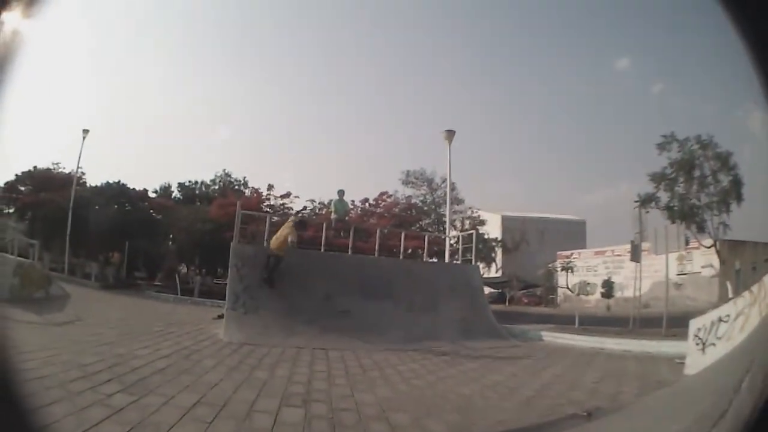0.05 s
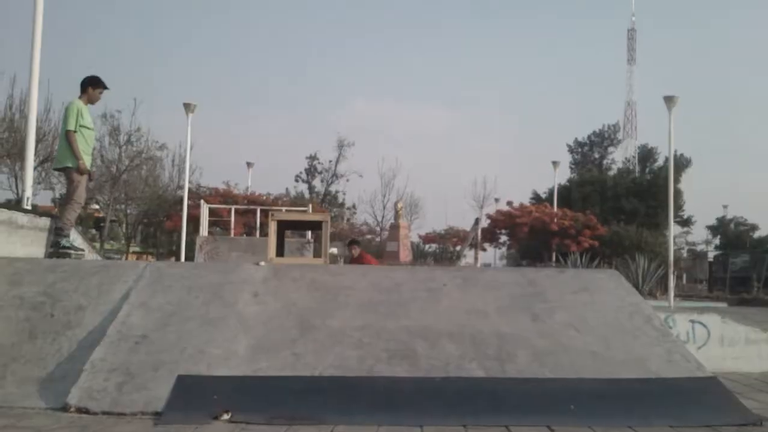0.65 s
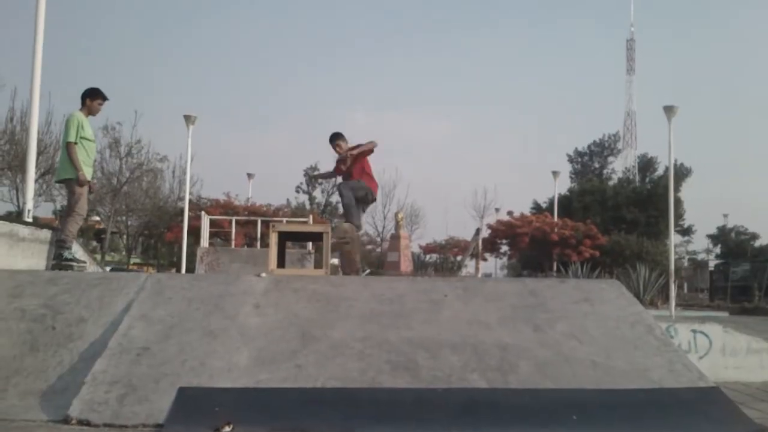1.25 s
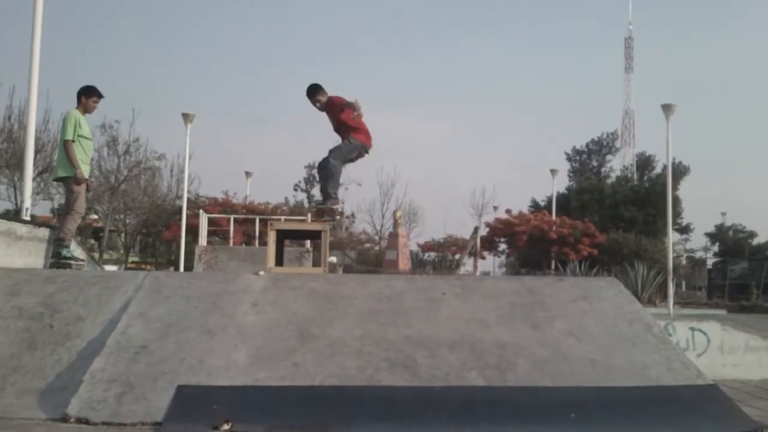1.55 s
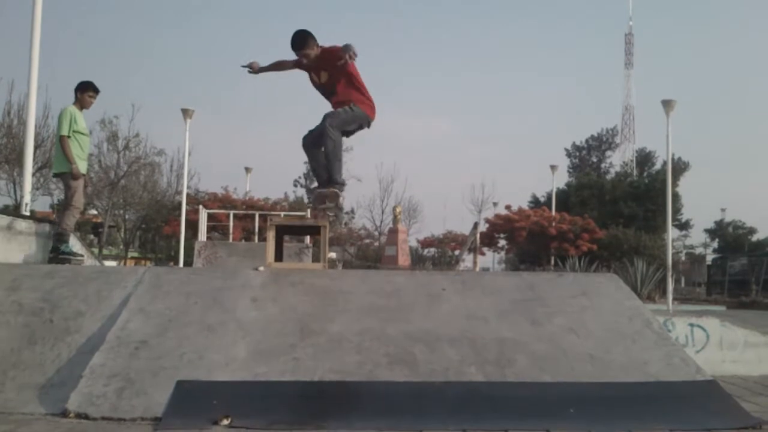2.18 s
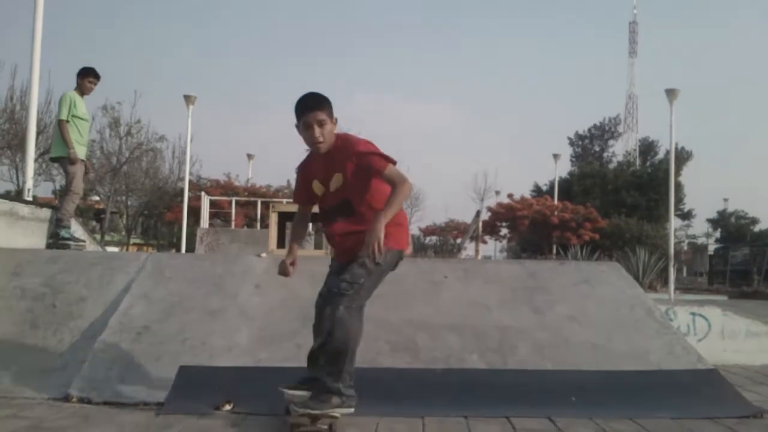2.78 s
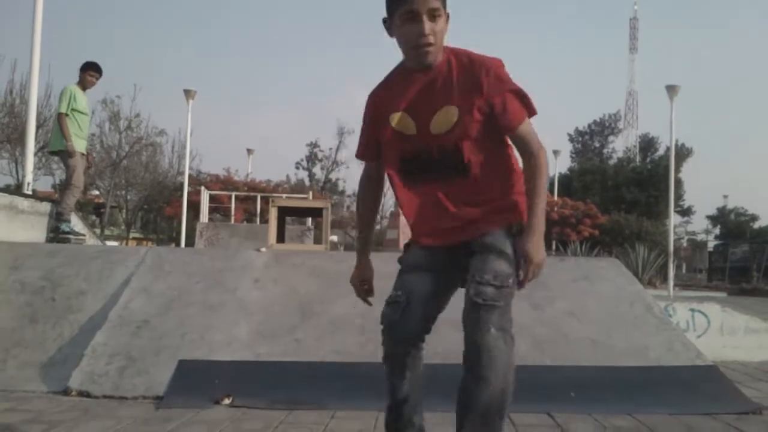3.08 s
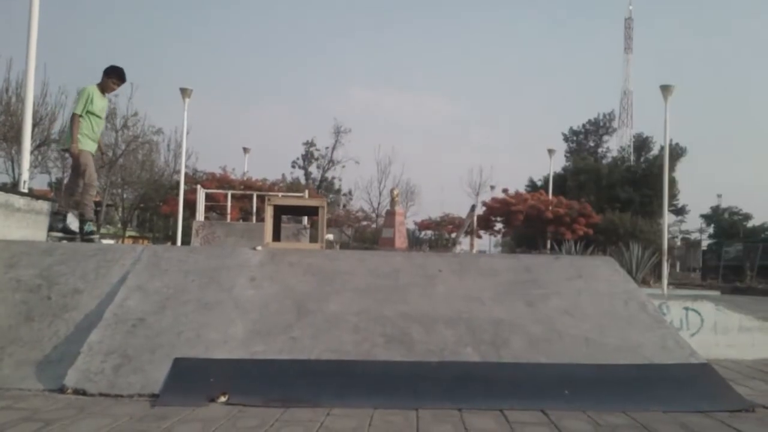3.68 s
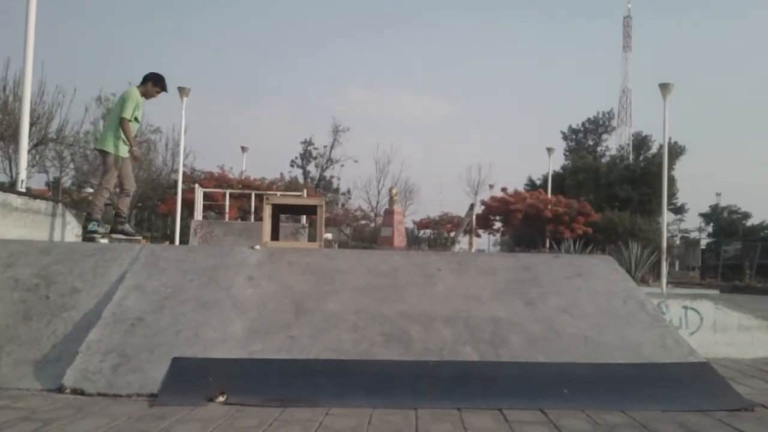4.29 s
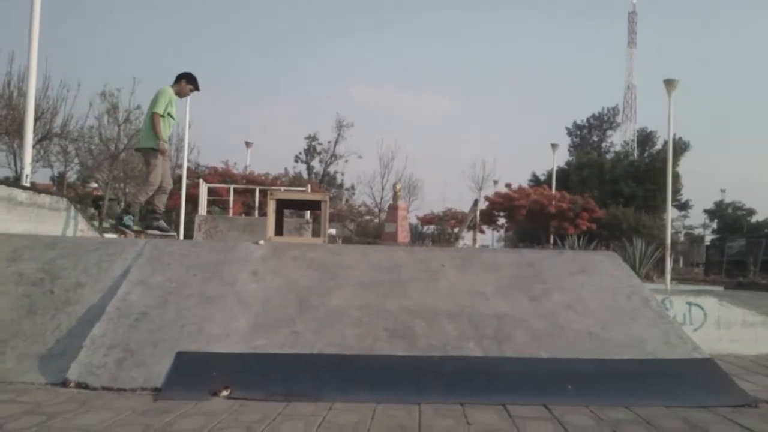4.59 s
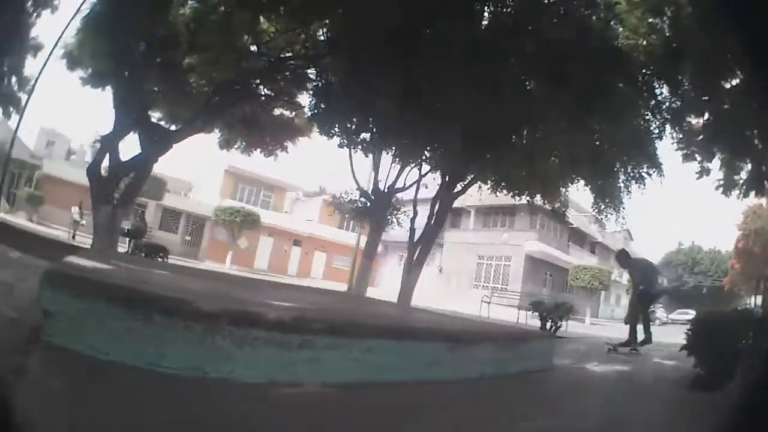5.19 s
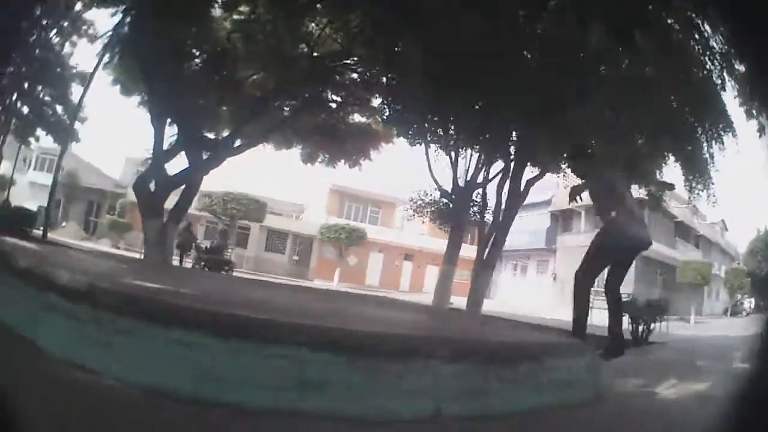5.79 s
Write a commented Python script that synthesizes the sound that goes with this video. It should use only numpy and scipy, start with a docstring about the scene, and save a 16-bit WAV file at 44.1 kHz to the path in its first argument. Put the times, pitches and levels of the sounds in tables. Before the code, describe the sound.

Skateboard wheels rumble on concrete with sharp clacks, a short grind, a loud rattling pass and two quick skids, over light wind.

```python
"""Skateboarding on concrete in three places, over wind and town wash, on a small microphone that overloads.
First a board rumbles away up a ramp under faint whistles. At 0.39 s, in the second place, a skater runs up,
pops onto a box, grinds it on the trucks, drops down a bank and clatters past over paving joints; wheels stick
and slip in two skids, and another board rolls in with a rising whirr. At 4.86 s, in the third place, a board
roars over rough concrete and is popped at a ledge, tail and wheels ringing the deck."""
import sys
import numpy as np
from scipy import signal
from scipy.fft import rfft, irfft
from scipy.io import wavfile
from scipy.ndimage import uniform_filter1d

SR = 44100
rng = np.random.default_rng(int(sys.argv[2]) if len(sys.argv) > 2 else 0)


def wrap_up_sound(samples):
    """Save the sound to the file named by the first command line argument, as 16-bit audio."""
    columns = np.atleast_2d(samples).T
    # keep every value between -1 and 1, then stretch to whole-number steps
    tamed = np.clip(columns, -1, 1)
    steps = np.round(tamed * 32767).astype(np.int16)
    wavfile.write(sys.argv[1], SR, steps)


N = 257984
TIME = np.arange(N) / SR
SECOND_PLACE_S, THIRD_PLACE_S = 0.39, 4.864
BANK_S, PAVING_S, CLOSEST_S, GONE_S = 2.52, 2.78, 3.68, 4.19   # cues of the pass-by
LOW_EDGE_HZ, HIGH_EDGE_HZ = 400, 1500   # crossovers between rumble, roar and grit


def from_db(db):
    return 10 ** (np.asarray(db) / 20)


def rms_one(x):
    return x / np.sqrt(np.mean(x ** 2) + 1e-20)


def gate(start, end):
    """Open between two times, with 6 ms fades."""
    return np.clip(np.minimum(TIME - start, end - TIME) / .006 + 1, 0, 1)


def arch(full_s, leave_s, rise_db_per_s, fall_db_per_s):
    """Attack, hold and release, in dB relative to the hold."""
    return -rise_db_per_s * np.maximum(full_s - TIME, 0) - fall_db_per_s * np.maximum(TIME - leave_s, 0)


def add(out, start_s, sound):
    """Mix a one-shot in at its cue."""
    at = max(round(start_s * SR), 0)
    out[at:at + len(sound)] += sound[:N - at]


def cut(x, hz, kind, order=2):
    return signal.sosfilt(signal.butter(order, hz, kind, fs=SR, output="sos"), x)


def coloured(x, eq):
    """Apply an EQ curve that rolls off beyond its ends."""
    hz, db = np.transpose(eq)
    f = np.maximum(np.arange(N // 2 + 1) * SR / N, 1)
    skirts = 1 / (1 + (hz[0] / f) ** 8) / (1 + (f / hz[-1]) ** 8)
    return irfft(rfft(x) * from_db(np.interp(np.log(f), np.log(hz), db)) * np.sqrt(skirts), N)


def resonate(x, hz, width_hz):
    """One resonance, with its upper skirt damped."""
    r = np.exp(-np.pi * width_hz / SR)
    rung = signal.lfilter([1 - r, 0, r - 1], [1, -2 * r * np.cos(2 * np.pi * hz / SR), r * r], x + 1e-18)
    return cut(rung, min(2 * hz, SR / 3), "low")


def body(force, modes):
    """A sustained force through parallel resonances of alternating polarity; rms 1."""
    return rms_one(sum((-1) ** k * from_db(db) * rms_one(resonate(force, hz, width))
                       for k, (hz, width, db) in enumerate(modes)))


def drift(rate_hz):
    """Random modulation with spread 1."""
    knots = rng.standard_normal(2048)
    return np.interp(TIME * rate_hz % 2047, np.arange(2048), knots) * np.sqrt(1.5)


def grains(per_s, spread_db):
    """Tiny collisions of uneven size at random moments; rms 1."""
    sizes = from_db(spread_db * np.minimum(rng.exponential(1, N), 4)) * rng.choice([-1, 1], N)
    return rms_one(sizes * (rng.random(N) < per_s / SR))


def gliding(hz, width_hz, spread_db):
    """The grain of the ground excites one resonance whose pitch moves; rms 1."""
    carrier = np.exp(2j * np.pi * np.cumsum(hz) / SR)
    return rms_one((carrier * cut(grains(3000, spread_db) / carrier, width_hz / 2, "low")).real)


def blow(modes, rattle_s, crack, scatter=0.016, clump_db=2.0):
    """A sharp contact and an uneven dying rattle ring each mode; one row of samples per mode."""
    t = np.arange(SR // 4) / SR
    clumps = np.interp(t, np.arange(100) / 400, rng.standard_normal(100))
    envelope = np.exp(-t / rattle_s) * from_db(clump_db * clumps)
    rings = []
    for k, (hz, width, db) in enumerate(modes):
        force = rng.standard_normal(len(t)) * envelope
        force[0] += crack * (-1) ** k
        # load and point of contact vary from blow to blow and detune the modes, the high ones most
        detune = np.exp(scatter * np.sqrt(hz / 1000) * rng.standard_normal())
        ring = resonate(force, hz * detune, width)
        loudest_rms = np.sqrt(uniform_filter1d(ring ** 2, SR // 200).max())
        rings.append(from_db(db) * ring / loudest_rms)
    return np.array(rings)


# EQ of the wind buffeting: frequency_hz, gain_db
WIND_EQ = [(8.8, -35.5), (15, -23.5), (36, -1), (49, 2), (59, -3.5), (75, -3), (140, -8.5), (158, -14),
           (200, -10.5), (260, -41.5), (440, -120)]
# EQ of the distant town: frequency_hz, gain_db
TOWN_EQ = [(65, -23.5), (110, -7), (217, -10.5), (270, -3.5), (386, -14.5), (723, -13), (1680, -24.5),
           (3150, -38.5), (5390, -51), (8000, -96), (10400, -112), (17600, -120)]
# Fader moves of the ambience bed: time_s, wind_db (before trim), town_db
AIR_FADERS = [(0.0, -33.5, -36.5), (0.38, -32.5, -46), (0.4, -32, -40.5), (1.4, -32, -37), (2.4, -33, -37),
              (4.2, -36.5, -41), (4.85, -34, -42), (4.9, -39.5, -34.5), (5.85, -42, -43)]


def open_air(wind_trim_db=2.5, gust_db=1.0):
    """Wind buffets the microphone over the wash of the town."""
    time_s, wind_db, town_db = np.transpose(AIR_FADERS)
    wind = rms_one(coloured(rng.standard_normal(N), WIND_EQ))
    wind *= from_db(np.interp(TIME, time_s, wind_db) + wind_trim_db + gust_db * drift(13))
    town = rms_one(coloured(rng.standard_normal(N), TOWN_EQ))
    return wind + town * from_db(np.interp(TIME, time_s, town_db))


def park_echo(x, echo_db=-17, t60_s=0.2, dull_hz=4500):
    """Ramps and walls add a short, dull tail to the direct sound."""
    t = np.arange(SR // 2) / SR
    tail = cut(rng.standard_normal(len(t)) * from_db(-60 * t / t60_s) * (t > .008), dull_hz, "low")
    return x + from_db(echo_db) * signal.fftconvolve(x, tail / np.linalg.norm(tail))[:N]


# Thin, high swells: full_s, release_s, pitch_hz, level_db
WHISTLES = [(0.082, 0.1, 4115, -56), (0.125, 0.15, 4120, -64.5), (0.165, 0.237, 4140, -54.5),
            (0.262, 0.363, 4130, -55), (0.105, 0.14, 4500, -67), (0.277, 0.374, 4540, -57)]


def whistles(waver_hz=7, flutter_db=3.0, fade_db_per_s=800):
    """Faint whistles swell, waver and fade in the first place."""
    out = 0
    for full_s, release_s, pitch_hz, level_db in WHISTLES:
        phase = 2 * np.pi * np.cumsum(pitch_hz + waver_hz * drift(71)) / SR
        swell_db = arch(full_s, release_s, fade_db_per_s, fade_db_per_s) + flutter_db * drift(29.6)
        out = out + np.sqrt(2) * np.sin(phase) * from_db(level_db + swell_db)
    return out * gate(0, SECOND_PLACE_S)


def rolling(band_db, eq, bumps_per_s, lumpy_db):
    """Wheels run over the grains of the concrete; unevenness makes the load on them flutter."""
    # single bumps stand out of a wash of countless finer ones
    ground = coloured(grains(bumps_per_s, spread_db=2.0) + 0.78 * rng.standard_normal(N), eq)
    rumble = cut(ground, LOW_EDGE_HZ, "low", order=4)
    roar = cut(ground, [LOW_EDGE_HZ, HIGH_EDGE_HZ], "band", order=4)
    grit = cut(ground, HIGH_EDGE_HZ, "high", order=4)
    mix = sum(from_db(db) * rms_one(band) for db, band in zip(band_db, (rumble, roar, grit)))
    return mix * from_db(lumpy_db * drift(110))


# EQ of wheels on the ramp: frequency_hz, gain_db
RAMP_EQ = [(59, -32), (100, 3), (295, -11.5), (467, -8.5), (765, -14), (971, -15), (1190, -23.5),
           (4210, -51), (5060, -53), (5340, -88), (8000, -68), (10400, -108), (17600, -120)]
# Their base mix: rumble_db, roar_db, grit_db
RAMP_MIX = (-35, -32, -47)


def ramp_roll(fade_shares=(0.23, 1, 1)):
    """A board rolls away up a ramp, its rumble lasting longest."""
    away_db = arch(0, 0.047, 0, fall_db_per_s=130)
    band_db = [db + share * away_db for db, share in zip(RAMP_MIX, fade_shares)]
    return rolling(band_db, RAMP_EQ, bumps_per_s=2200, lumpy_db=2.5) * gate(0, SECOND_PLACE_S)


# EQ of wheels on the run-up: frequency_hz, gain_db
RUN_UP_EQ = [(59, -37), (100, -3.5), (247, 2.5), (410, -15.5), (587, -11), (1200, -23.5), (1450, -20.5),
             (2700, -23), (4080, -18), (7320, -77), (9000, -77), (11700, -111), (19800, -120)]
# Their base mix: rumble_db, roar_db, grit_db
RUN_UP_MIX = (-38, -38.5, -62.5)


def run_up(slows_s=0.93):
    """A board runs up behind the bank and fades as it slows, until the first pop."""
    roll = rolling(RUN_UP_MIX, RUN_UP_EQ, bumps_per_s=970, lumpy_db=3.0)
    return roll * from_db(arch(0, slows_s, 0, fall_db_per_s=28)) * gate(SECOND_PLACE_S, SLAMS[0][0])


# EQ of the other board's wheels: frequency_hz, gain_db
OTHER_BOARD_EQ = [(59, -23), (100, 7.5), (124, -3), (164, 4), (240, 2.5), (388, -9), (473, 2), (599, -20),
                  (743, 7.5), (1510, -13), (2370, -11), (2950, -34), (3450, -33), (5640, -26), (11000, -58),
                  (14300, -100), (22000, -120)]
# Their base mix: rumble_db, roar_db, grit_db
OTHER_BOARD_MIX = (-18, -27, -38.5)


def other_board(start_s=4.47, full_s=4.926, swell_shares=(.9, .75, .45), whirr_db=-36.5, rasp_db=-14.5):
    """Another board rolls in after the skids, swelling and rasping higher as it gathers speed."""
    swell_db = arch(full_s, THIRD_PLACE_S, rise_db_per_s=56, fall_db_per_s=0)
    band_db = [db + share * swell_db for db, share in zip(OTHER_BOARD_MIX, swell_shares)]
    roll = rolling(band_db, OTHER_BOARD_EQ, bumps_per_s=1200, lumpy_db=3.0)
    whirr_hz = 1800 + 2760 * np.clip(TIME - start_s, 0, 1)
    whirr = gliding(whirr_hz, width_hz=480, spread_db=5.5)
    rasp = from_db(rasp_db) * gliding(1.7 * whirr_hz, width_hz=1100, spread_db=2.0)
    whirr_gain = from_db(whirr_db + 0.5 * swell_db + 2.0 * drift(130))
    return (roll + (whirr + rasp) * whirr_gain) * gate(start_s, THIRD_PLACE_S)


# EQ of wheels on rough concrete: frequency_hz, gain_db
ROUGH_EQ = [(59, -66), (100, -25), (146, -1), (304, -5), (460, 1), (621, -5.5), (779, -1), (958, -10),
            (1160, -7), (1780, -14), (2910, -29.5), (5310, -30.5), (6660, -42.5), (8040, -90.5),
            (9000, -93), (11700, -116), (19800, -120)]
# Their base mix: rumble_db, roar_db, grit_db
ROUGH_MIX = (-27, -23, -44.5)


def rough_roll(patch_s=5.05, patch_fade_s=0.064, patch_db=13, lift_s=(5.517, 5.537), lift_db=-7):
    """A board roars over rough concrete, crosses a gritty patch, and ducks briefly as its wheels lift."""
    rumble_db, roar_db, grit_db = ROUGH_MIX
    grit_db = grit_db + patch_db * np.exp(-np.abs(TIME - patch_s) / patch_fade_s)
    roll = rolling((rumble_db, roar_db, grit_db), ROUGH_EQ, bumps_per_s=8300, lumpy_db=1.64)
    fader_db = lift_db * gate(*lift_s) + arch(0, SLAMS[-1][0], 0, fall_db_per_s=0.5)
    return roll * from_db(fader_db) * gate(THIRD_PLACE_S, TIME[-1])


def pass_path(speed_m_per_s=6.1, miss_m=0.77, bank_db=-10, jolt_db=6, settle_s=0.073, behind_s=3.94):
    """The pass-by: bearing (-1 approaching, 1 leaving), distance gain and ground gain, both in dB."""
    along_m = speed_m_per_s * (TIME - CLOSEST_S)
    distance_m = np.hypot(along_m, miss_m)
    # a quiet, smooth bank, a jolt at its foot, then the shadow behind the microphone
    surface_db = np.where(TIME < PAVING_S, bank_db, jolt_db * np.exp(-np.abs(TIME - PAVING_S) / settle_s))
    shadow_db = arch(0, behind_s, 0, fall_db_per_s=30)
    return along_m / distance_m, 20 * np.log10(miss_m / distance_m), surface_db + shadow_db


def shaking(kick_db, settle_s):
    """How hard the board still shakes: each of the WHEEL_KNOCKS kicks it, and it settles."""
    kicks = np.zeros(N)
    for (start_s, *_), db in zip(WHEEL_KNOCKS, kick_db):
        add(kicks, start_s, from_db([db]))
    return signal.lfilter([1], [1, -np.exp(-1 / (settle_s * SR))], kicks + 1e-18)


# EQ of wheels on paving: frequency_hz, gain_db
PAVING_EQ = [(59, 0), (100, 14), (424, -1), (687, -8.5), (817, -11), (1160, -17), (1430, -17.5),
             (1700, -35), (1980, -21), (2800, -38), (3270, -37), (6540, -52.5), (10000, -89), (13000, -87),
             (22000, -120)]
# Their base mix: rumble_db, roar_db, grit_db
PAVING_MIX = (-22.5, -22.5, -38.5)
# How each band follows distance (1 = inverse distance): rumble_share, roar_share, grit_share
DISTANCE_SHARES = (0.55, 0.93, 0.055)
# Swells of the wheels' hollow ring: full_s, release_s, width_hz, level_db
HOLLOW_SWELLS = [(2.924, 3.143, 85, -31), (3.603, 3.695, 110, -23.5)]


def pass_by(near_db, ground_db, hollow_hz, full_jolt_db=-17, lull_db=-6):
    """The board rolls down the bank and past, loudest just after each knock; its wheels ring hollow."""
    band_db = [db + share * near_db for db, share in zip(PAVING_MIX, DISTANCE_SHARES)]
    roll = rolling(band_db, PAVING_EQ, bumps_per_s=1100, lumpy_db=2.5)
    ring = 0
    for full_s, release_s, width_hz, level_db in HOLLOW_SWELLS:
        swell_db = arch(full_s, release_s, rise_db_per_s=140, fall_db_per_s=80)
        ring = ring + gliding(hollow_hz, width_hz, spread_db=8.0) * from_db(level_db + swell_db)
    # close by, the lulls between knocks are heard; farther off they fill in
    shake = shaking([level_db for _, level_db, *_ in WHEEL_KNOCKS], settle_s=0.024)
    calm = 1 - np.tanh(shake / from_db(full_jolt_db))
    duck_db = lull_db * calm * from_db(near_db / 2)
    return (roll * from_db(ground_db) + ring) * from_db(duck_db) * gate(BANK_S, GONE_S)


# Wheel hubs, rung by grit and bearings: pitch_hz, width_hz, gain_db
HUB_MODES = [(2120, 340, 3), (3050, 620, -5.5), (4080, 1100, 0.5), (5500, 990, -6.5), (6800, 2600, -3)]
# Scuffs of wheels and shoes: full_s, release_s, level_db
SCUFFS = [(0.805, 0.812, -46.5), (0.875, 0.877, -43.5), (0.926, 0.936, -47), (1.34, 1.344, -54),
          (1.385, 1.385, -59), (1.533, 1.547, -59), (1.587, 1.577, -59), (2.594, 2.696, -54.5),
          (2.912, 2.915, -34), (3.297, 3.338, -37.5), (3.835, 3.867, -39.5), (4.473, 4.494, -40.5)]


def scuffs(uneven_db=1.0):
    """Wheels and shoes crush grit in brief, dense scrapes."""
    grit = cut(body(grains(4000, spread_db=3.5), HUB_MODES), 6470, "low", order=6)
    envelope = sum(from_db(level_db + arch(full_s, release_s, rise_db_per_s=2500, fall_db_per_s=260))
                   for full_s, release_s, level_db in SCUFFS)
    return grit * from_db(uneven_db * drift(150)) * envelope


def bearings(pass_db, tick_db=-34, pass_share=0.81, clatter_db=-16.5):
    """Loose bearings tick all through the pass-by; each of the WHEEL_KNOCKS shakes out a gritty clatter."""
    ticks = cut(body(grains(1500, spread_db=4.5), WHEEL_MODES[2:]), 5560, "low", order=4)
    ticks *= from_db(tick_db + pass_share * pass_db) * gate(PAVING_S, GONE_S)
    clatter = cut(body(grains(3000, spread_db=2.0), HUB_MODES), 7200, "low", order=6)
    shake = shaking([level_db + click_db for _, level_db, _, _, click_db in WHEEL_KNOCKS], settle_s=0.011)
    return ticks + clatter * from_db(clatter_db) * shake


# Body of a skidding urethane wheel: pitch_hz, width_hz, gain_db
URETHANE_MODES = [(332, 210, -9), (650, 330, 0), (1070, 140, -3.5), (1420, 190, 0), (2030, 63, -10.5),
                  (2263, 190, -5.5), (3510, 370, -8.5), (4570, 960, -6.5), (5700, 1300, -12),
                  (9300, 4800, -19.5)]
# Sideways skids: start_s, end_s, slips_per_s, wander_share, grit_db, chatter_db, squeal_db, bend_hz
SKIDS = [(4.259, 4.298, 358, .055, -20, -20.5, -29.5, 25.1),
         (4.333, 4.382, 333, .035, -26.5, -19, -23, 242)]


def skids(touch_s=4.237, hiss_db=-22, travel_s=0.0036, squeal_hz=1940, bend_s=0.0084):
    """A wheel sticks and slips in a rasping buzz under hissing grit; at full grip it squeals."""
    rows = np.array(SKIDS)
    nearest = np.abs(TIME[:, None] - rows[:, :2].mean(axis=1)).argmin(axis=1)
    start_s, end_s, slips_per_s, wander_share, grit_db, chatter_db, squeal_db, bend_hz = rows[nearest].T
    slip_count = np.cumsum(slips_per_s * (1 + wander_share * drift(70) + .035 * drift(200))) / SR
    slips = np.diff(np.floor(slip_count), prepend=0) * from_db(2.2 * drift(300))
    noise = rng.standard_normal(N)
    force = slips + from_db(grit_db) * noise + from_db(hiss_db) * cut(noise, 3000, "high", order=4)
    # bending waves carry the highs faster than the lows and smear each slip; travel_s holds at 1 kHz
    f = np.arange(N // 2 + 1) * SR / N
    smeared = irfft(rfft(force) * np.exp(-4j * np.pi * travel_s * np.sqrt(1000 * f)), N)
    chatter = cut(body(smeared, URETHANE_MODES), 9500, "low", order=6) * from_db(chatter_db)
    pitch_hz = squeal_hz + bend_hz * np.exp(np.minimum(TIME - end_s, 0) / bend_s)
    phase = 2 * np.pi * np.cumsum(pitch_hz * (1 + 0.0141 * drift(400))) / SR
    grip_db = arch(end_s, end_s, rise_db_per_s=280, fall_db_per_s=1997) + 2.0 * drift(350)
    squeal = np.sqrt(2) * np.sin(phase) * from_db(squeal_db + grip_db)
    envelope = from_db(arch(start_s, end_s, rise_db_per_s=900, fall_db_per_s=1004))
    return (chatter + squeal) * envelope * gate(touch_s, THIRD_PLACE_S)


# Body of the box under the trucks: pitch_hz, width_hz, gain_db
BOX_MODES = [(690, 630, 0.5), (1274, 200, -3), (1540, 84, -1.5), (2145, 130, -6.5), (2620, 220, -4.5),
             (4270, 760, -17.5)]
# Ring of the trucks as they bite: pitch_hz, width_hz, gain_db
BITE_MODES = [(1240, 90, 0.5), (1480, 160, -2), (2540, 200, -4)]


def grind(start_s=1.70, locked_s=1.816, end_s=2.096, scrape_db=-37.5, bite_db=-27, uneven_db=3.0):
    """The trucks settle on the edge of the box and scrape along it; near its end they bite and ring."""
    scrape = cut(body(grains(3500, spread_db=2.0), BOX_MODES), 5000, "low", order=4)
    slide_db = arch(locked_s, end_s, rise_db_per_s=117, fall_db_per_s=1299.5)
    scrape *= from_db(scrape_db + slide_db + uneven_db * drift(40.05))
    bite = cut(body(grains(3900, spread_db=4.0), BITE_MODES), 5000, "low", order=4)
    bite *= from_db(bite_db + arch(end_s, end_s, rise_db_per_s=170, fall_db_per_s=899))
    return (scrape + bite) * (TIME > start_s)


def shallow_joints(pass_db, start_s=3.70, end_s=4.12, per_s=27, pass_share=0.64, thud_db=-6, click_db=-17):
    """Cues for lesser knocks at uneven intervals, fading as the board leaves; rows like WHEEL_KNOCKS."""
    lateness, softness = rng.standard_normal((60, 2)).T
    times_s = start_s + (np.arange(60) + lateness / 4) / per_s
    levels_db = -23 + pass_share * np.interp(times_s, TIME, pass_db) - 3.5 * softness
    return [(s, db, thud_db, 0, click_db) for s, db in zip(times_s, levels_db) if s < end_s]


# Body of wheel and axle: pitch_hz, width_hz, gain_db
WHEEL_MODES = [(205.5, 124, 1), (300.6, 71, -6), (859, 140, 1.5), (1430, 120, -6), (2090, 250, 1),
               (2525, 410, 0.5), (2750, 190, -4.5), (3930, 1600, -9.5), (6800, 2000, -14.5)]
# Short knocks and ticks of the wheels (paving joints, board rattle, skid start and end):
# start_s, level_db, then relative thud_db, hollow_db, click_db
WHEEL_KNOCKS = [(0.655, -29.5, 3, 5, -35), (0.881, -32, 9, 2, -11), (1.557, -29.5, 0, -13, -7.5),
                (2.532, -36, -1, -6, -2), (2.864, -22, 8, 4.5, -8), (2.884, -11.5, -7, -4.5, -16.5),
                (2.9195, -13.5, -8, -0.5, -19), (2.947, -11.5, -7, -9, -23), (2.96, -24.5, -1, 7, -2.5),
                (2.988, -18, -1.5, -2, -25), (3.005, -18, -15, -1, -10), (3.03, -19.5, -11, 2.5, -23),
                (3.0793, -14, 3, 4, -13.5), (3.117, -38, -3, 0, -2), (3.139, -20.5, -17, 3, -7),
                (3.164, -25.5, 13, 6.5, -15), (3.216, -22, 9, -6, -8), (3.238, -33, 1, -1, -3),
                (3.261, -20.5, 9, -3, -10), (3.287, -26, 13, 0, -4), (3.315, -18, 8.5, -3.5, -10),
                (3.336, -25, -8, -7, 3), (3.371, -17.5, -6, 0, -6), (3.389, -28, -7, -16, 6),
                (3.42, -15, -16, -13, -5.5), (3.446, -19, 5.5, -15, -4.5), (3.476, -22.5, 13, -1, -0.5),
                (3.526, -9.5, -3.5, 3, -7), (3.548, -22.5, -7, -6, -10), (3.563, -29, 0, -3, -9),
                (3.577, -16.5, -2, 13.5, -3), (3.597, -34, 6, 5, 0), (3.63, -27.5, 8, -2, 2),
                (3.641, -12, -8, 6.5, -1), (3.648, -9.5, -18, 5.5, -13.5), (3.658, -25.5, 17.5, 3, -7),
                (3.671, -20.5, 5, 11, -10), (3.676, -15, 1, -1, 1), (3.689, -24, 1, 13, -16),
                (3.7284, -4.5, -12, -5, -12.5), (3.738, -16.5, 2, 4, 5.5), (3.749, -22, 0, -3, -4),
                (3.768, -12, 0, -8, -16), (3.794, -17.5, 8, 2, -11), (3.831, -21, 8.5, 2, -7),
                (3.847, -15, -6, 3, -13), (3.858, -14, 5.5, -12, -11.5), (3.866, -21.5, 3, 1, -8),
                (3.912, -16, -5, -13, -18), (4.042, -30, -7, -3, -7), (4.231, -28, -10, -7, -6.5),
                (4.394, -23, -15, -13, -4), (4.4693, -25.5, -2, 0.5, -1), (4.649, -21, 0.5, -1.5, -2.5),
                (4.695, -28, 11, -7, -9), (4.73, -26.5, 6, 2, -2), (4.771, -19, -3, 2, -4.5),
                (4.795, -17, 10.5, -12, -2.5), (4.807, -27, 18, -1, -5), (4.833, -19.5, -2, -7, -7),
                (4.85, -19.5, 5, -6, -3), (5.423, -20, 4.5, 8, -18), (5.545, -18.5, -2, 4, -33),
                (5.559, -22.5, 9, 11, -26)]


def wheel_knocks(pass_db, hollow_hz, hollow_width_hz=50, trim_db=-7.0):
    """Each short knock or tick rings wheel and axle: a thud, a hollow clock and a click."""
    out = np.zeros(N)
    band = np.searchsorted([LOW_EDGE_HZ, HIGH_EDGE_HZ], [hz for hz, _, _ in WHEEL_MODES])
    for start_s, level_db, thud_db, hollow_db, click_db in WHEEL_KNOCKS + shallow_joints(pass_db):
        # the hollow ring is struck at whatever pitch it has just then
        modes = WHEEL_MODES + [(np.interp(start_s, TIME, hollow_hz), hollow_width_hz, 0)]
        mode_db = np.append(np.array([thud_db, 0, click_db])[band], hollow_db)
        rings = blow(modes, rattle_s=0.0038, crack=1.38, clump_db=1.0)
        add(out, start_s, from_db(mode_db + level_db + trim_db) @ rings)
    return cut(out, 6800, "low", order=6)


# Body of deck and trucks: pitch_hz, width_hz, gain_db
BOARD_MODES = [(183.4, 21.6, -4.5), (370, 570, -.5), (465, 210, -5), (736, 72, -3.5), (792, 275, 0),
               (1197, 110, -2.5), (1406, 160, 0), (2130, 220, -7.5), (2490, 290, -6), (2900, 420, -15),
               (3750, 230, -14.5), (4220, 160, -12), (4600, 310, -23.5), (5200, 560, -23.5),
               (7150, 800, -27.5), (8000, 1300, -18.5)]
# Tone of each pop or landing: start_s, knock_db, snap_db, bright_db, rattle_s
SLAMS = [(1.3372, -8, 1.5, -11, 0.0035), (1.652, -3, 1, -3, 0.0083), (2.461, -2.5, -4.5, -4, 0.0041),
         (2.697, -0.5, 1.5, 5, 0.02), (2.783, -6, 0.5, 4, 0.019), (5.296, 10, -5, -14, 0.006),
         (5.5035, 15.5, -18, 4, 0.0034)]
# Tail and wheels touching down in turn within a slam: start_s, level_db, thump_db, hard_db
CONTACTS = [(1.337, -14.5, -5, 0), (1.6503, -10.5, -5, 1), (1.6597, -3, 1, 0.5), (1.666, -1.5, -14, 3.5),
            (1.679, -14.5, 19, -5), (1.7023, -16, 5, 9), (1.717, -22.5, 7, -2), (1.831, -25.5, -2, -3),
            (2.4626, -6, -7, 1), (2.4704, -13, -5, -7), (2.4753, -13.5, -3, 6), (2.4902, -8.5, 1.5, -3),
            (2.4977, -17.5, 7, 4), (2.6965, -13, -1, 3.5), (2.707, -13, -1, -3), (2.7135, -17, 0, -6),
            (2.725, -18, -11, -9), (2.7788, -21.5, -3, 6), (2.7838, -5.5, -3, 0), (2.802, -17, 6, -9),
            (5.296, -1, -5, 1), (5.31, -7, 3, -8), (5.33, -21.5, 12, -2), (5.339, -22.5, -3, 6),
            (5.503, -7, -8, -6), (5.509, -20.5, -2, -7)]


def slams(rattle_growth_per_s=3.3, trim_db=-8.0):
    """Tail and wheels hit the ground: weight brings out the deck's bending mode, hard contact the metal."""
    out = np.zeros(N)
    log_modes = np.log([hz for hz, _, _ in BOARD_MODES])
    eq_hz = [200, 350, 600, 1300, 2300, 4200, 7400]
    for start_s, level_db, thump_db, hard_db in CONTACTS:
        slam = min(SLAMS, key=lambda row: abs(row[0] - start_s))
        slam_s, knock_db, snap_db, bright_db, rattle_s = slam
        lows_db = [thump_db, knock_db - max(thump_db, 0) / 2, knock_db, 0]
        highs_db = [db + hard_db for db in (snap_db, bright_db, 3.47 * bright_db)]
        mode_db = np.interp(log_modes, np.log(eq_hz), lows_db + highs_db)
        # as the rider's weight comes down, later contacts rattle longer
        rings = blow(BOARD_MODES, rattle_s * (1 + rattle_growth_per_s * (start_s - slam_s)), crack=8.2)
        add(out, start_s, from_db(level_db + mode_db + trim_db) @ rings)
    return cut(out, 7230, "low", order=6)


def scene():
    """Rolls, whistles and ambience stay dry; knocks, scrapes and skids also echo in the park."""
    bearing, near_db, ground_db = pass_path()
    pass_db = near_db + ground_db
    hollow_hz = 501 - 140 * bearing   # the wheels' hollow ring falls as the board goes by
    wheels = ramp_roll() + run_up() + pass_by(near_db, ground_db, hollow_hz) + other_board() + rough_roll()
    knocks = slams() + wheel_knocks(pass_db, hollow_hz)
    action = park_echo(knocks + bearings(pass_db) + scuffs() + grind()) + park_echo(skids(), echo_db=-24)
    return (wheels + action + whistles() + open_air())[None]


def record(dry, mic_top_hz=12000, ceiling=0.38, cutoff_hz=16000):
    """The microphone loses the top octave, its amplifier flattens the peaks, and the top is cut."""
    drive = cut(dry, mic_top_hz, "low", order=8) / ceiling
    clipped = ceiling * drive / (1 + drive ** 16) ** (1 / 16)
    return signal.sosfiltfilt(signal.butter(16, cutoff_hz, fs=SR, output="sos"), clipped)


dry = scene()
out = record(dry)
wrap_up_sound(out)
```